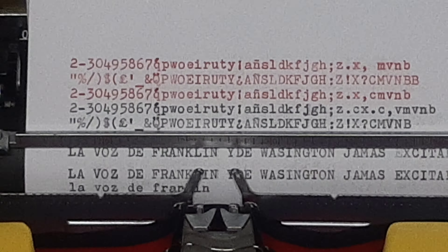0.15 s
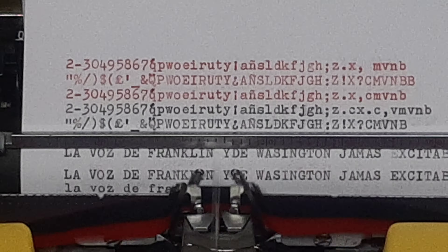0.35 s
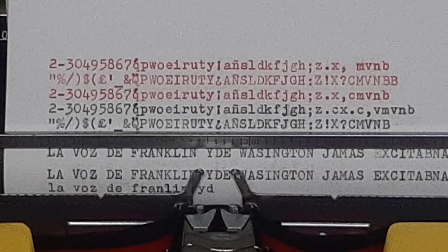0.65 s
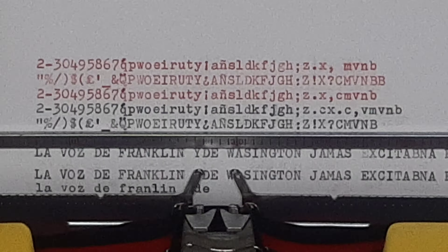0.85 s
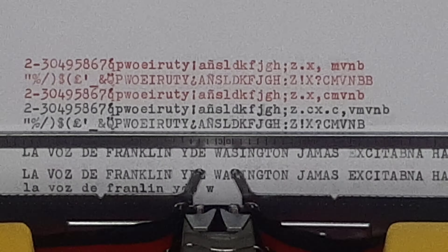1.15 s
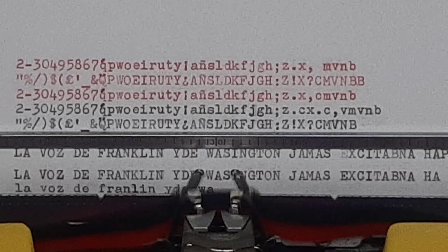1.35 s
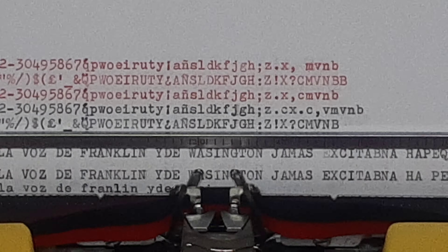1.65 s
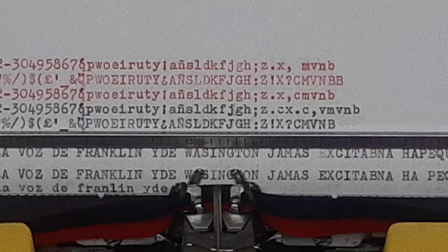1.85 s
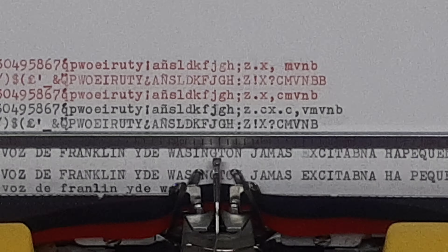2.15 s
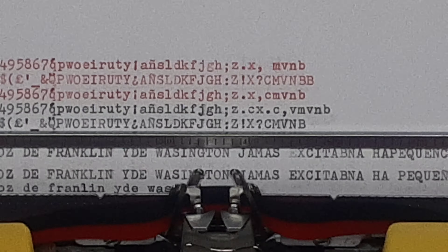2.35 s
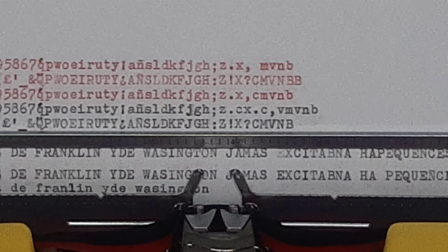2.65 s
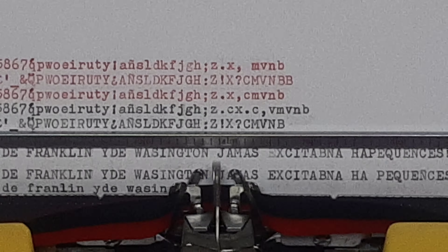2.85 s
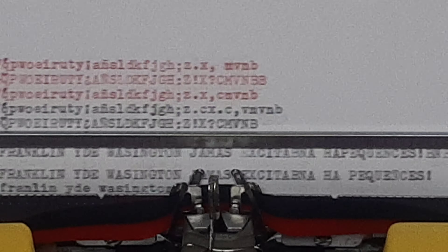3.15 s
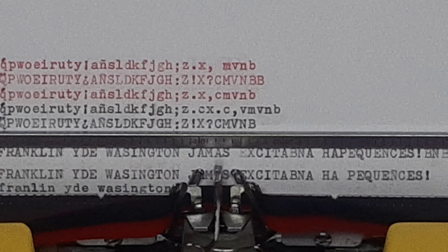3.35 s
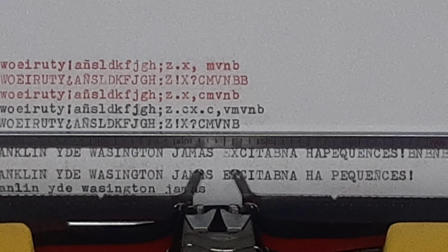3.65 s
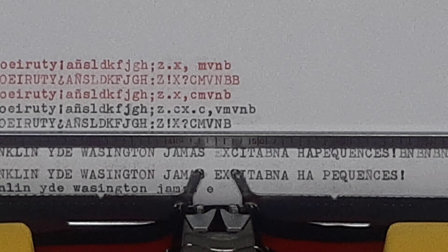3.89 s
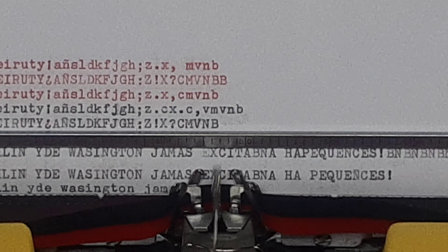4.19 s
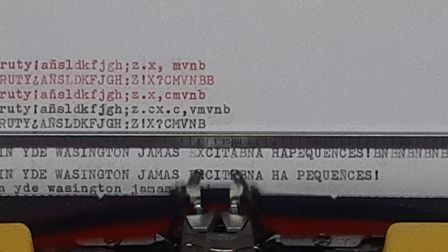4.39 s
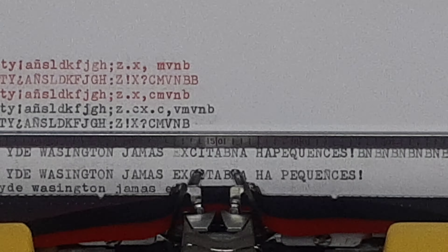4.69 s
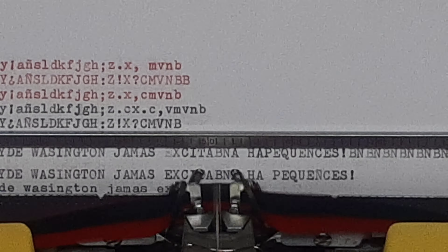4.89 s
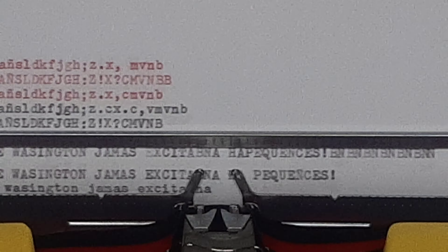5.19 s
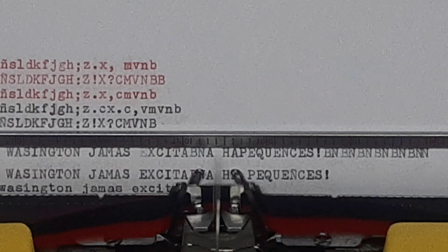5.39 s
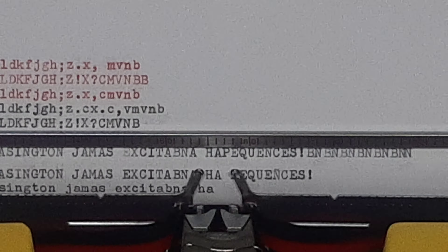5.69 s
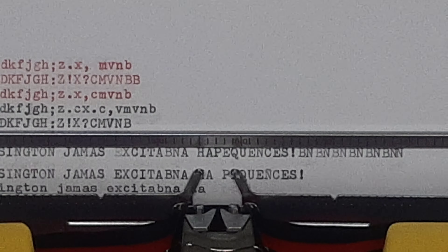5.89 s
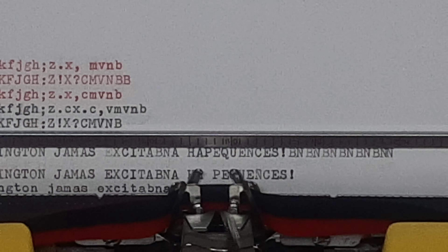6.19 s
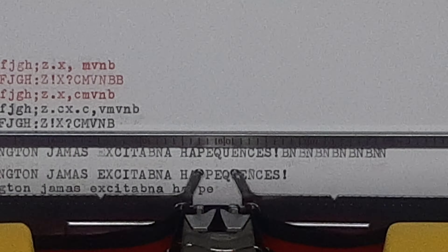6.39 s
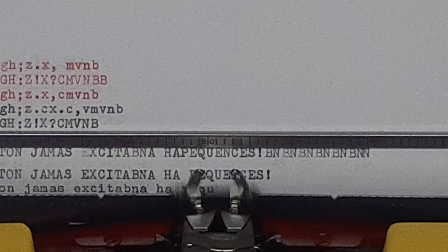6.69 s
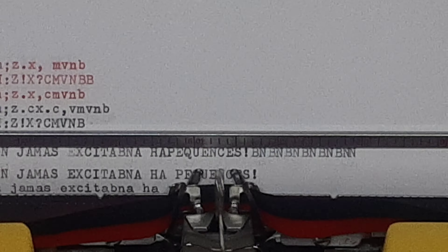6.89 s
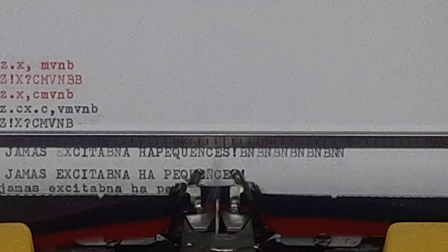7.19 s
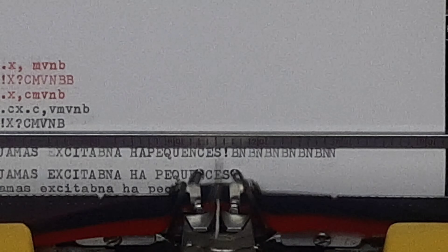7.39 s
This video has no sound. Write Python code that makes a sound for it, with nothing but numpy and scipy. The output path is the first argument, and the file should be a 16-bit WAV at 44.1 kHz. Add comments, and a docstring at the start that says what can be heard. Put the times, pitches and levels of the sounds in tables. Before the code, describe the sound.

A manual typewriter is typed quickly and fairly evenly up close, sharp metallic key slaps and softer space bar clacks in a quiet room.

```python
"""On a desk in a quiet room, a portable manual typewriter is typed on quickly, close to a stereo microphone.
Levers scrape and click as grainy filtered noise, type bars slap the platen with a crack and ringing modes,
the frame rattles, the desk thumps, and each bar clatters back into its basket. The space bar clacks going
down and coming up. The room adds a noise tail; a steady hush and a faint deep rumble lie underneath."""
import sys
import numpy as np
from scipy import signal
from scipy.fft import rfft, irfft
from scipy.io import wavfile

SR = 44100
rng = np.random.default_rng(int(sys.argv[2]) if len(sys.argv) > 2 else 0)


def int16_out(signal):
    """Quantize to a 16-bit WAV file."""
    q = np.round(np.clip(np.atleast_2d(signal).T, -1, 1) * 32767)
    wavfile.write(sys.argv[1], SR, q.astype(np.int16))


N = 332514
T = np.arange(int(.3 * SR)) / SR  # seconds, for short sounds
T_LONG = np.arange(int(.7 * SR)) / SR  # seconds, for long rings and the room

# The letter keys. Each row: strike in seconds, slap in dB, key travel before the strike in seconds,
# fall of the bar after it in seconds, landing in the basket in dB, share of spring ring from 0 to 1.
LETTER_KEYS = [(0.0356, -21.5, 0.033, .093, -37, 0), (0.4839, -22, 0.032, 0.08, -37, 0.8),
               (0.6083, -22.5, 0.045, 0.098, -37, 0.1), (0.8087, -19, 0.031, 0.12, -44, 0),
               (1.1287, -18.5, 0.039, 0.1, -37.5, 0.7), (1.3469, -20, .036, 0.13, -38.5, 0),
               (1.5446, -19, .033, 0.1, -45, 0), (1.696, -24.5, 0.019, 0.099, -37, 0.5),
               (1.9058, -21.5, 0.036, 0.1, -47.5, 0), (2.0475, -23.5, 0.018, 0.09, -36.5, 0),
               (2.2452, -21.5, .035, 0.11, -56, 0), (2.3972, -22.5, 0.045, 0.094, -36.5, 0.2),
               (2.622, -21, 0.033, .101, -36.5, 0), (2.944, -20.5, 0.04, 0.11, -41, 0.8),
               (3.03, -22, .02, .088, -38, .6), (3.1694, -23, 0.038, .095, -40, 0),
               (3.2532, -20, 0.012, 0.11, -38.5, 0.7), (3.4728, -19, 0.034, 0.11, -41, 1),
               (3.825, -21, 0.041, .1, -37.5, 0.8), (4.048, -22, 0.039, .13, -39.5, .6),
               (4.257, -20, 0.036, .096, -38.5, 0.5), (4.4206, -21, 0.043, 0.11, -48, 0.7),
               (4.5212, -22.5, 0.027, 0.088, -39, 0.1), (4.7242, -21, .046, 0.14, -39, 0.5),
               (4.8612, -21.5, 0.021, .087, -34.5, 0), (5.0162, -22.5, 0.02, 0.11, -47, 0.1),
               (5.1263, -18.5, 0.018, .124, -38, 0.1), (5.5132, -18.5, 0.031, 0.089, -35, 0),
               (5.673, -20, 0.038, 0.13, -37.5, 1), (6.2706, -21, .0425, .095, -40, 1),
               (6.3707, -22, 0.018, 0.092, -37, .8), (6.5904, -17, 0.047, 0.12, -37, 0.7),
               (6.827, -20, 0.035, 0.14, -59, 0), (6.9672, -24.5, 0.027, 0.091, -45, 0),
               (7.1261, -21.5, 0.043, 0.097, -36.5, 0), (7.3134, -19, .035, 0.1, -37.5, 0.6),
               (7.5111, -16.5, 0.024, .095, -41, .4)]
# Spectrum of the scraping key levers. Each row: frequency in Hz, level in dB.
LINKAGE_SPECTRUM = [(100, -12.5), (500, -6), (1300, -2), (1600, -6), (2300, 2), (3200, -2.5), (6000, -3.5),
                    (11000, -3), (16000, -16)]
# Spectrum of contacts in the type basket. Each row: frequency in Hz, level in dB.
BASKET_SPECTRUM = [(100, -7.5), (500, -7), (820, -3), (1000, -7), (1350, 1.5), (1600, -5), (2300, -2.5),
                   (3500, -6), (6000, -6), (10000, -6.5), (16000, -17.5)]


def undb(db):
    """Decibels to gain."""
    return 10 ** (np.asarray(db) / 20)


def level(x, db, span_s):
    """Scale a sound so that its first span_s seconds have this rms level."""
    opening = x[:, :int(span_s * SR)]
    return x * undb(db) / np.sqrt(np.mean(opening ** 2))


def add(out, s, x):
    """Mix a sound in at time s in seconds."""
    start = max(int(s * SR), 0)
    out[:, start:start + x.shape[1]] += x[:, :max(N - start, 0)]


def colour(x, points, bright_db=0):
    """Minimum-phase filter with the given spectrum; brightness tilts 2.5-7 kHz and shifts all above."""
    size = 2048
    log_hz = np.log(np.maximum(np.arange(size // 2 + 1) * SR / size, 1))
    hz, db = np.transpose(points)
    treble = np.interp(log_hz, np.log([2500, 7000]), [0, 1])
    db = np.interp(log_hz, np.log(hz), db) + bright_db * treble
    # folding the cepstrum onto positive times makes the filter causal
    cepstrum = irfft(np.log(undb(db)))
    cepstrum[1:size // 2] *= 2
    cepstrum[size // 2 + 1:] = 0
    impulse = irfft(np.exp(rfft(cepstrum)))
    return signal.oaconvolve(x, impulse[None], axes=1)[:, :x.shape[1]]


def noise(size, apart_hz=1300):
    """Stereo noise: alike in the bass, increasingly unrelated towards the treble."""
    mid, side = rng.standard_normal((2, size))
    side = signal.lfilter(*signal.butter(1, apart_hz, "high", fs=SR), side)
    return np.array([mid + side, mid - side])


def chatter(envelope, grain_db, size=30):
    """Dense tiny metal contacts, each size samples long and of uneven strength, under an envelope."""
    strengths = undb(grain_db * rng.standard_normal(len(envelope) // size + 1))
    contacts = np.repeat(strengths, size)[:len(envelope)]
    return noise(len(envelope), apart_hz=1660) * contacts * envelope


def fade(t60_s, t=T):
    """Exponential decay by 60 dB in t60_s seconds."""
    return undb(-60 * t / t60_s)


def bounce(delay_s, t60_s):
    """Envelope of a later contact: silence, a sudden start, a decay."""
    return (T > delay_s) * fade(t60_s, np.abs(T - delay_s))


def ring(modes, detune, scatter_db, rise_s, loose, t=T):
    """Decaying modes; every blow weights and detunes them anew, and a loose contact scatters their phases."""
    out = np.zeros((2, len(t)))
    draws = rng.standard_normal((len(modes), 3))
    for (hz, db, t60_s, pan_db), (pitch, weight, phase) in zip(modes, draws):
        u = t[t < 1.2 * t60_s]
        struck_hz = hz * (1 + detune * pitch)
        wave = np.sin(2 * np.pi * struck_hz * u + loose * phase) * fade(t60_s, u)
        sides_db = np.array([[pan_db], [-pan_db]]) / 2
        out[:, :len(u)] += undb(db + scatter_db * weight + sides_db) * wave
    return out * (1 - np.exp(-t / rise_s))


def hush():
    """The quiet room's low hush: steady filtered noise."""
    # Spectrum of the hush. Each row: frequency in Hz, level in dB.
    hush_spectrum = [(25, -11), (60, -4.5), (130, 1), (260, -6.5), (500, -8.5), (1000, -15), (2000, -21),
                     (3500, -26), (6000, -40), (11000, -36.5), (16000, -46)]
    return level(colour(noise(N), hush_spectrum), -54, N / SR)


def rumble():
    """A deep rumble of low-filtered noise swells twice early on, then stays faint."""
    # Spectrum of the rumble. Each row: frequency in Hz, level in dB.
    rumble_spectrum = [(20, -3), (33, -2), (55, -8), (90, -26), (300, -55)]
    # Course of the rumble. Each row: time in seconds, level in dB before an overall cut of 1.4 dB.
    rumble_course = [(0.0, -62), (0.4, -54), (1.04, -70), (1.73, -58), (1.98, -69), (7.33, -69), (7.5, -76)]
    course_db = np.interp(np.arange(N) / SR, *np.transpose(rumble_course))
    return level(colour(noise(N), rumble_spectrum), -1.4, N / SR) * undb(course_db)


def room(x, wet_db, t60_s):
    """A small furnished room: a diffuse tail that builds up over the first reflections."""
    # Spectrum of the room's tail. Each row: frequency in Hz, level in dB.
    tail_spectrum = [(100, 8.5), (500, -1), (1400, -0.5), (2500, -0.5), (6000, -0.5), (11000, -6.5),
                     (16000, -1)]
    build_up = 1 - np.exp(-T_LONG / 0.0053)
    tail = noise(len(T_LONG), apart_hz=500) * fade(t60_s, T_LONG) * build_up
    tail = colour(tail, tail_spectrum)
    tail *= undb(wet_db) / np.sqrt(np.sum(tail ** 2) / 2)
    return signal.oaconvolve(x, tail, axes=1)[:, :N]


def shell(db):
    """The thin metal shell sings on faintly after a hard blow, in long-lived modes."""
    # Modes of the shell. Each row: frequency in Hz, level in dB, t60 in seconds, left minus right in dB.
    shell_modes = [(245.5, -5, 0.7, 1.5), (517, -8.5, 0.41, 0), (1323, 2, 0.6, 4), (1467, -9, 0.69, 0),
                   (2470, -9.5, 0.93, 2), (3460, -8.5, 0.76, 6)]
    song = ring(shell_modes, detune=0.00797, scatter_db=2, rise_s=0.008, loose=2.17, t=T_LONG)
    return level(song, db, 0.039)


def thump(db, push_hz, slope_db=4.5):
    """The desk takes the blow slowly and booms, most in the modes near the pitch of the push."""
    # Modes of the desk under the machine.
    # Each row: frequency in Hz, level in dB, t60 in seconds, left minus right in dB.
    desk_modes = [(57.6, -11, 0.2, 2), (108.9, -5, .26, 2), (138.7, -5, 0.11, -3), (176.8, 1, 0.23, 1.5),
                  (256, -9, 0.13, -1)]
    pushed = []
    for hz, mode_db, t60_s, pan_db in desk_modes:
        octaves_off = abs(np.log2(hz / push_hz))
        pushed.append((hz, mode_db - slope_db * octaves_off, t60_s, pan_db))
    return level(ring(pushed, detune=.03, scatter_db=3.0, rise_s=0.009, loose=1), db, 0.051)


def drop(db, bright_db):
    """A type bar or lever drops on its rest, hops once and makes the basket ring."""
    # Modes of the type basket.
    # Each row: frequency in Hz, level in dB, t60 in seconds, left minus right in dB.
    basket_modes = [(694, -4, 0.12, -1), (854, 0, 0.077, -7), (997, -5.5, 0.057, 12),
                    (1159, -0.5, 0.053, 12), (1319, -4, 0.088, 2), (2165, 2.5, 0.058, 2),
                    (2756, -5.5, 0.054, 10), (3430, -6, 0.047, 3), (4040, -6, .05, 2)]
    when, force = rng.random(2)
    contacts = (1 - np.exp(-T / 0.0015)) * fade(0.096)
    contacts += 0.6 * force * bounce(0.0045 + .01 * when, 0.072)
    clatter = colour(chatter(contacts, grain_db=3.5), BASKET_SPECTRUM, bright_db - 3.0)
    clatter = level(clatter, -2.13, 0.0081)
    # a dull contact is a heavy one and rings the basket more
    clunk = ring(basket_modes, detune=0.0085, scatter_db=5.5, rise_s=0.0024, loose=2.13)
    clunk = level(clunk, -8 - 0.67 * bright_db, 0.015)
    return (clatter + clunk) * undb(db)


def returns():
    """After each strike a lever ticks and the bar lands; rebounds and a soft stroke add a few knocks."""
    # Extra knocks: bars rebounding just after a strike, a half-hearted key stroke, other lever contacts.
    # Each row: time in seconds, drop level in dB,
    # brightness in dB relative to a drop's own, which is 3 dB down in the treble.
    extra_knocks = [(0.525, -39.5, 1), (2.8791, -32, 0.5), (4.0889, -38.5, 2), (6.728, -30, -1),
                    (6.7582, -41.5, -4)]
    out = np.zeros((2, N))
    for s, _, _, fall_s, db, _ in LETTER_KEYS:
        # the tick comes 79 % of the way through the bar's fall
        add(out, s + .79 * fall_s, drop(-45.5, bright_db=5))
        # a landing heavier than the usual -39 dB is duller
        add(out, s + fall_s, drop(db, bright_db=1.5 - 0.4 * (db + 39)))
    for s, db, bright_db in extra_knocks:
        add(out, s, drop(db, bright_db))
    return out


def linkage(length_s, db):
    """The key levers click into motion and scrape along in jerks until the type bar lands."""
    scrape = 0.67 + 0.33 * T / length_s + 0.53 * fade(0.025)
    push = np.where(T < length_s, scrape, np.exp(-np.abs(T - length_s) / 0.0031))
    steps = T[::250]
    jerks = undb(2 * np.interp(T, steps, rng.standard_normal(len(steps))))
    return level(colour(chatter(push * jerks, grain_db=2.0), LINKAGE_SPECTRUM), db, length_s)


def escapement(db):
    """The escapement's pawl trips: a short burst of tiny metal contacts."""
    trip = chatter(fade(0.069), grain_db=1.5)
    return level(colour(trip, LINKAGE_SPECTRUM, bright_db=1), db, 0.0089)


def space_bar(blows, bright_db, hold_s, t60_s, landing_db, rack_db, desk_db):
    """The same parts collide each time: they judder, the carriage lands and rings, and the desk thumps."""
    # Spectrum of bar, stop and carriage. Each row: frequency in Hz, level in dB.
    carriage_spectrum = [(100, -13.5), (400, -6.5), (900, -0.5), (1500, -1), (2300, -4), (3300, -3),
                         (5300, -5), (8000, -6.5), (11000, -11), (16000, -29.5)]
    # Modes of the space bar and carriage rack.
    # Each row: frequency in Hz, level in dB, t60 in seconds, left minus right in dB.
    rack_modes = [(696, 0.5, 0.075, -3), (1280, -7.5, 0.12, -4), (1680, -10.5, 0.12, -11),
                  (2025, 0, 0.062, -5), (2275, 1, 0.058, 2), (2450, 1, 0.038, 12), (3030, -5, 0.084, 0),
                  (4130, -8.5, 0.07, 7), (5030, -13, 0.092, -2), (5570, -8, 0.091, 4)]
    out = np.zeros((2, N))
    steel = noise(len(T))  # the countless modes of bar and stop
    for s, db in blows:
        held = fade(t60_s, np.maximum(T - hold_s, 0))  # full strength for hold_s, then a decay
        judder = (1 - np.exp(-T / 0.00041)) * (held + .06 * fade(0.25))
        clack = steel * judder + .5 * chatter(judder, grain_db=3)
        clack = level(colour(clack, carriage_spectrum, bright_db), -0.51, .012)
        landing = chatter(bounce(.016, 0.12), grain_db=3.5)
        landing = level(colour(landing, carriage_spectrum, bright_db=-16), landing_db, 0.02)
        rack = ring(rack_modes, detune=0.0029, scatter_db=1.5, rise_s=0.0045, loose=1.57)
        rack = level(rack, rack_db, 0.015)
        add(out, s - .006, escapement(db - 19.5))
        add(out, s, (clack + landing + rack) * undb(db))
        add(out, s + 0.0078, thump(db + desk_db, push_hz=108, slope_db=12))
        add(out, s, shell(db - 27.5))
    return out


def spaces():
    """The space bar clacks down, the carriage jumps one step, and the bar comes up against its stop."""
    # Strokes of the space bar. Each row: pressed at in seconds, press level in dB, held for in seconds,
    # release level in dB; the colliding parts are set relative to these levels.
    strokes = [(0.237, -28.5, .097, -37), (0.93, -30, .074, -29.5), (2.7555, -25, .091, -26.5),
               (3.6385, -25, .0985, -28), (5.2965, -26.5, .113, -28), (5.824, -26, .119, -29.5)]
    presses = [(s, db) for s, db, _, _ in strokes]
    releases = [(s + held_s, db) for s, _, held_s, db in strokes]
    down = space_bar(presses, bright_db=2.2, hold_s=0.0035, t60_s=0.062,
                     landing_db=-17, rack_db=-7.0, desk_db=-21.5)
    up = space_bar(releases, bright_db=0.5, hold_s=0.0078, t60_s=0.085,
                   landing_db=-11.5, rack_db=-12, desk_db=-24)
    return down + up


def spring_ring():
    """A key spring sings on in one long-lived high mode."""
    # Mode of a key spring. Each row: frequency in Hz, level in dB, t60 in seconds, left minus right in dB.
    spring_modes = [(4754, 0, .55, 0)]
    song = ring(spring_modes, detune=0.00041, scatter_db=0, rise_s=.002, loose=1.8, t=T_LONG)
    return level(song, -49, 0.05)


def frame(db, bright_db, steel):
    """The blow spreads: steel rings, loose parts rattle, the platen answers late and the carriage settles."""
    # Spectrum of the rattling frame. Each row: frequency in Hz, level in dB.
    frame_spectrum = [(100, -22.5), (400, -12), (800, -7), (1550, -6.5), (2200, -2), (3300, -4),
                      (4700, -7.5), (7000, -7.5), (11000, -13.5), (16000, -27.5)]
    # Modes of the platen and carriage.
    # Each row: frequency in Hz, level in dB, t60 in seconds, left minus right in dB.
    platen_modes = [(594, -12.5, 0.045, 2), (700, -13, 0.061, -2), (796, 0.5, 0.046, 2.5),
                    (853.3, 0.5, 0.054, 1), (940, -22, 0.021, 10), (1156, -4.5, 0.055, 7),
                    (1320, -3.5, 0.064, -3), (1421, -8.5, 0.06, 4), (1748, -5, 0.055, -8)]
    shake = (1 - np.exp(-T / 0.0013)) * (fade(0.054) + 0.058 * fade(0.13))
    rattle = chatter(shake, grain_db=3.5) + 0.6 * steel * shake
    rattle = level(colour(rattle, frame_spectrum, bright_db), -0.88, 0.028)
    platen = ring(platen_modes, detune=0.006, scatter_db=0.9, rise_s=0.0028, loose=0.87)
    platen = level(platen, -6.6, 0.019)
    late, force = rng.standard_normal(2)
    settle = chatter(bounce(.02 + .004 * late, 0.06), grain_db=3.0)
    settle = level(colour(settle, BASKET_SPECTRUM, bright_db=-9.0), -15.5 + 2 * force, 0.033)
    return (rattle + platen + settle) * undb(db)


def slap(db, bright_db, flex_hz=2300, contact_s=0.0021):
    """The type slug meets paper and platen: a crack, the bar flexes in contact, and the guide rings on."""
    # Spectrum of the crack. Each row: frequency in Hz, level in dB.
    slap_spectrum = [(100, -25), (300, -17), (700, -15), (1500, -10), (2200, -5.5), (3200, -6.5),
                     (4500, 1.5), (6500, 2), (8700, -11), (12000, -10), (16000, -32)]
    # Modes of the type bar and its guide.
    # Each row: frequency in Hz, level in dB, t60 in seconds, left minus right in dB.
    guide_modes = [(1940, -1.5, 0.024, -8), (2140, -0.5, 0.031, -8), (2454, -8, 0.031, 19.5),
                   (2780, -7, 0.0094, 17), (3095, -11, 0.022, -22), (3906, -4.5, 0.025, 15.5),
                   (4590, -5, 0.015, 1), (5070, -27, 0.021, -24), (8680, -3, 0.013, 4.5)]
    recoil = 7  # samples
    blow = np.zeros((2, len(T)))
    blow[:, 0], blow[:, recoil] = .7, -1
    crack = level(colour(blow, slap_spectrum, bright_db), -7, 0.0032)
    # each type bar has its own stiffness
    bar_hz = flex_hz * (1 + 0.1 * rng.standard_normal())
    contact = (1 - np.exp(-T / 0.0002)) * np.exp(-(T / contact_s) ** 4)
    side_phase = np.array([[.3], [-.3]])  # radians, left and right
    flex = np.sin(2 * np.pi * bar_hz * T + side_phase) * contact
    flex = level(flex, -3.5 - .7 * bright_db, 0.0028)
    guide = ring(guide_modes, detune=0.011, scatter_db=1.5, rise_s=0.00096, loose=2.0)
    guide = level(guide, -7, 0.0024)
    buzz = colour(chatter(fade(0.0092), grain_db=6.0), LINKAGE_SPECTRUM, bright_db)
    buzz = level(buzz, -7.8, 0.0049)
    return level(buzz - crack + flex + guide, db, 0.0032)


def letters():
    """Every letter: scrape, pawl tick, slap, rattle, thump, and the after-ring of shell and spring."""
    out = np.zeros((2, N))
    steel = noise(len(T))  # the frame's countless modes, the same for every letter
    tones = rng.standard_normal(len(LETTER_KEYS))
    for (s, slap_db, travel_s, _, _, spring), tone in zip(LETTER_KEYS, tones):
        force_db = slap_db + 21  # against a usual slap of -21 dB
        # the frame rattles much the same after any stroke
        frame_db = -31 + 0.16 * force_db
        # strikes get duller by 0.76 dB a second as the carriage moves along; keys differ
        bright_db = 3.5 - 0.76 * s + 1.6 * tone
        # a harder stroke scrapes louder
        add(out, s - travel_s, linkage(travel_s, db=-37 + 0.73 * force_db))
        # the pawl trips just before the type lands
        add(out, s - .0048, escapement(db=-36.5 + 0.36 * force_db))
        add(out, s, slap(slap_db, bright_db))
        add(out, s, frame(frame_db, bright_db, steel))
        add(out, s, thump(frame_db - 21.3, push_hz=177, slope_db=1.5))
        add(out, s, shell(frame_db - 31))
        add(out, s, spring * spring_ring())
    return out


def scene():
    """The machine on its desk, the room around it, a low steady hush and a deep rumble."""
    machine = letters() + returns() + spaces()
    return machine + room(machine, wet_db=-16.5, t60_s=0.39) + hush() + rumble()


def record(dry):
    """The stereo microphone: its right port is slightly further off and duller; the top is cut."""
    right_spectrum = [(100, -0.3), (1000, -2.0), (4500, 0.5), (9000, -1.57), (13000, -4.0)]  # Hz, dB
    right = colour(dry[1:], right_spectrum)[0]
    lag = 2  # samples
    ports = np.array([dry[0], np.pad(right, (lag, 0))[:N]])
    top_cut = signal.ellip(8, .2, 70, 16100, fs=SR, output="sos")  # low-pass at 16.1 kHz
    return signal.sosfilt(top_cut, ports)


dry = scene()
out = record(dry)
int16_out(out)
```